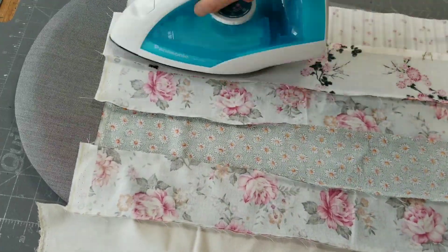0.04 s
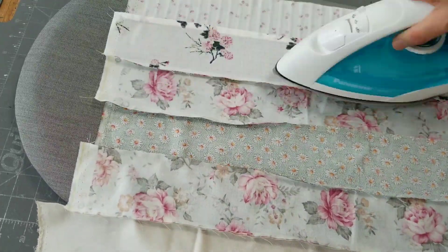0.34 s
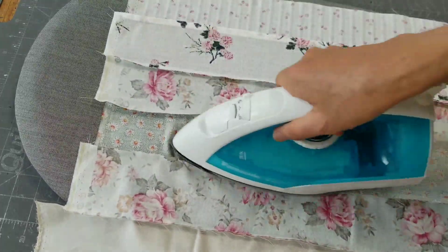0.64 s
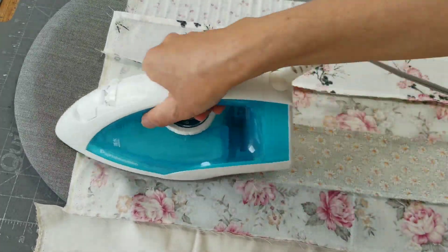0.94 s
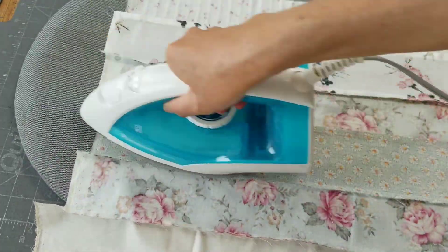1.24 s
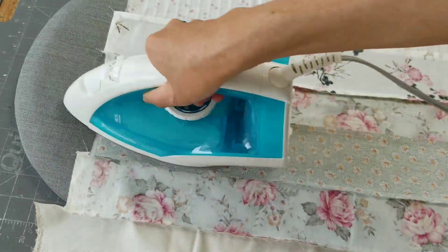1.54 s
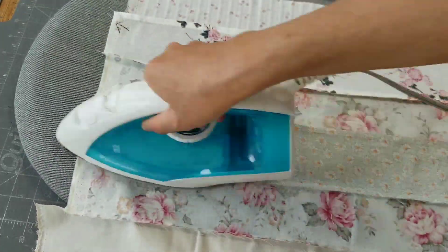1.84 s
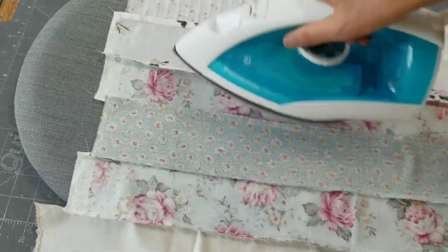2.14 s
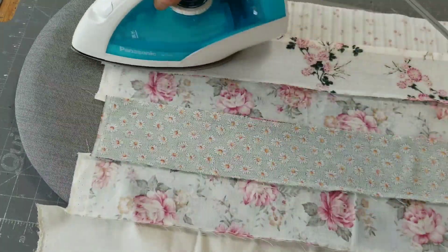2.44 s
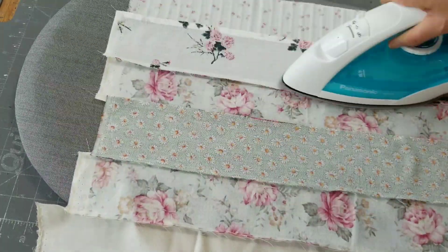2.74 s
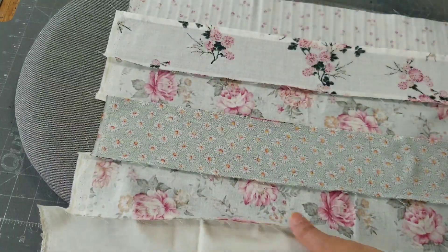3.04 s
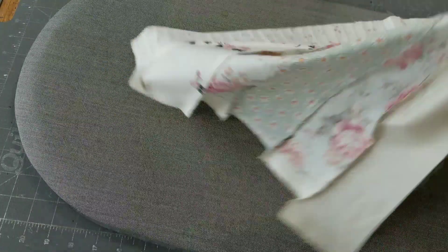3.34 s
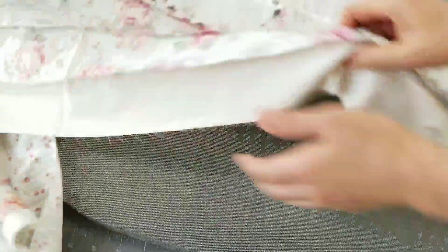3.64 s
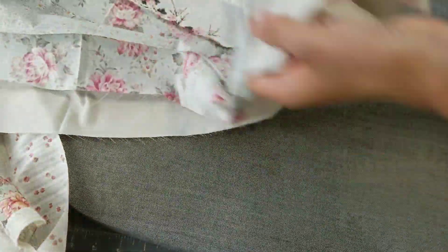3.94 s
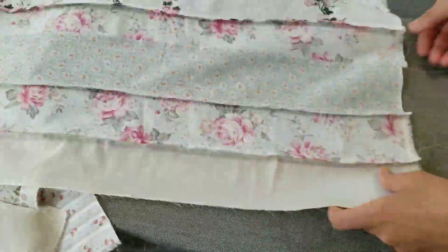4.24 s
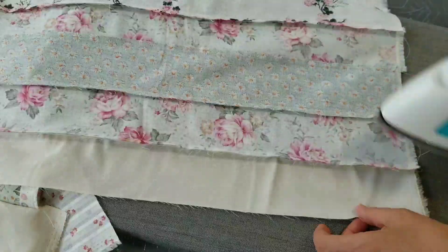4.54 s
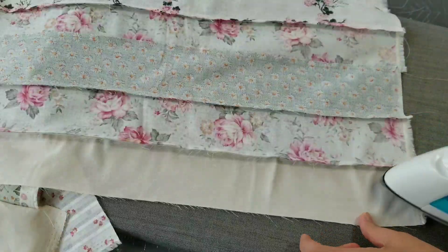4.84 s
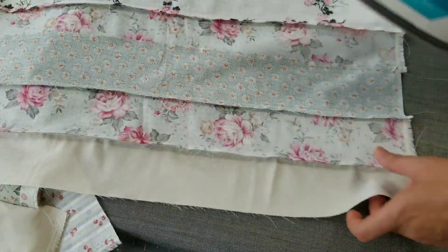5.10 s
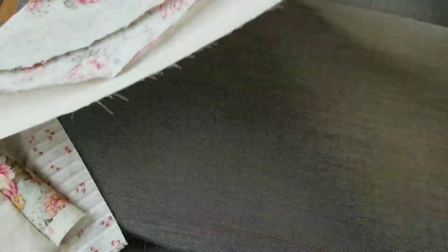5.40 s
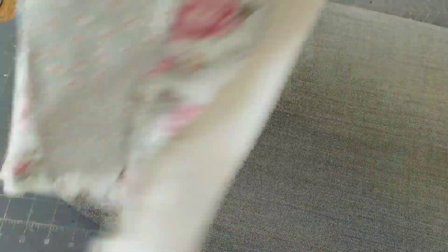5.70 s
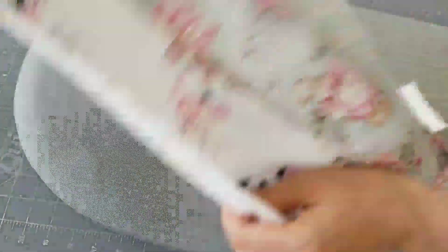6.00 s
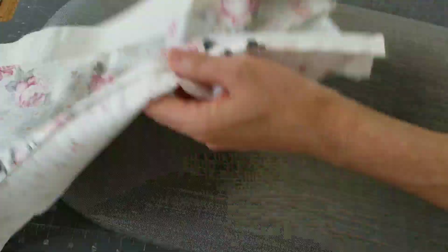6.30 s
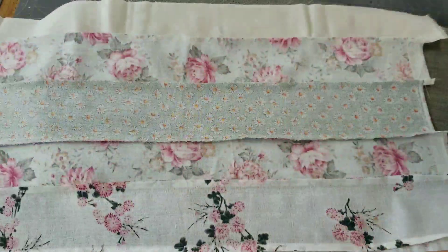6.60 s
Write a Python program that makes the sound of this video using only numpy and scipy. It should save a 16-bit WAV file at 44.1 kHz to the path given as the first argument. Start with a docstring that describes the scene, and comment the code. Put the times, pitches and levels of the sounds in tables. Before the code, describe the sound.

An iron slides to and fro over cloth with a faint hiss for the first three seconds, close to the microphone in a quiet room with a low rumble. It bumps dully on the padded ironing board at about 0.5 seconds and lands with a hollow knock at 2.3. After a light plastic tap at 3 seconds, a quick cluster of dull thumps and a scuff follows around 3.3. Fabric strips rustle softly on and off as they are lifted and turned. A small click comes at 3.7 seconds, then a sharp metallic click with a bump at 4.5 and a few lighter ticks. The loudest sound, a short booming stumble of thumps on the board, arrives at 5.4. From about 5 seconds a car passes faintly outside, its tyres swelling and engine note sinking. More rustling and a soft bump come around 6.2 seconds.

```python
"""An iron hisses softly over cloth, close to the microphone in a quiet room, then knocks down on the board.
Fabric strips are pressed, lifted and turned over: the padded top booms under each bump and its frame
buzzes, plastic and metal parts click, and fibres rustle as they catch and let go.
Late on, a car passes outside the window, its tyres swelling and its engine note sinking."""
import sys
import numpy as np
from scipy import signal
from scipy.fft import rfft, irfft
from scipy.io import wavfile
from scipy.ndimage import uniform_filter1d

SR = 44100
rng = np.random.default_rng(int(sys.argv[2]) if len(sys.argv) > 2 else 0)


def wrap_up_sound(samples):
    """Save the sound to the file named by the first command line argument, as 16-bit audio."""
    columns = np.atleast_2d(samples).T
    # keep every value between -1 and 1, then stretch to whole-number steps
    tamed = np.clip(columns, -1, 1)
    steps = np.round(tamed * 32767).astype(np.int16)
    wavfile.write(sys.argv[1], SR, steps)


N = 293706
TIME = np.arange(N) / SR
RING = TIME[:SR // 4]  # time since a blow

# Spectra give relative level per hertz; mode levels are relative to the blow.
# the room's rumble and the microphone's hiss: f/Hz, level/dB
RUMBLE_SPECTRUM = [(12, -26), (28, -6), (50, -4), (80, -1), (120, -5), (200, -13), (350, -19.5), (650, -27),
                   (1500, -33), (4000, -32)]
HISS_SPECTRUM = [(500, -18.5), (1500, -12.5), (3000, -8), (4800, -1), (5900, 1.5), (6800, 2), (7800, 11.5),
                 (8400, 7.5), (9400, -34.5), (11000, -29.5), (15800, -23), (17000, -40)]
# tyres and exhaust, heard from indoors: f/Hz, level/dB
TYRE_SPECTRUM = [(150, 2), (400, -1), (600, -5), (1100, 0.5), (1500, -7.5), (1950, -14), (3000, -29),
                 (6000, -49)]
EXHAUST_SPECTRUM = [(50, -2), (100, 1), (160, -3.5), (220, -3), (350, -7), (500, -14), (900, -37),
                    (3000, -89)]
# rubbing of the iron, pushed to and fro: t/s, level/dB
SLIDING = [(0.0, -70.5), (0.24, -74), (0.38, -66.5), (0.46, -95), (0.63, -69.5), (0.99, -79), (1.04, -79),
           (1.67, -76), (1.72, -69.5), (1.91, -76), (2.09, -80), (2.15, -66.5), (2.25, -97.5), (2.31, -70),
           (2.46, -71), (2.51, -84), (2.66, -67), (3.0, -84)]
# hiss of the soleplate: f/Hz, level/dB
SOLE_SPECTRUM = [(1500, -26), (3000, -8.5), (4200, -0.5), (5200, -3.5), (7000, 2), (12000, -16.5),
                 (17000, -32)]
# the soleplate sings faintly: t/s, length/s, f/Hz, level/dB
GLIDES = [(0.725, 0.15, 4470, -71), (1.085, 0.072, 4360, -68.5), (1.23, 0.074, 4400, -76),
          (1.356, .12, 3970, -75), (1.94, 0.16, 4430, -72), (2.15, 0.081, 4300, -73),
          (2.323, .16, 4320, -74.5)]
# drags on the padding: t/s, length/s, level/dB
SCUFFS = [(0.73, 0.16, -70), (3.247, 0.11, -43.5), (3.674, 0.074, -51.5), (3.989, .17, -63.5),
          (6.185, 0.28, -61)]
# rubbed padding, hissing fibres and the body of the weave: f/Hz, level/dB
PADDING_SPECTRUM = [(100, 1), (220, 3.5), (420, -3), (700, -10.5), (1500, -42), (4000, -55)]
FIBRE_SPECTRUM = [(600, -42), (1800, -29.5), (3600, -0.5), (6000, 3.5), (9500, 1), (13000, 2),
                  (15800, -3.5), (17000, -31)]
WEAVE_SPECTRUM = [(100, -10.5), (300, -1), (700, -1.5), (1130, 1), (2200, -3.5), (3500, -4.5), (7000, -20)]
# iron and hands sweep over the cloth: t/s, length/s, fibre level/dB, weave level/dB
STROKES = [(0, 0.22, -74, -72), (0.256, 0.2, -73, -71.5), (1.719, .11, -67, -65.5),
           (1.837, .15, -64.5, -69.5), (2.582, .2, -74, -69.5), (3.024, 0.071, -65, -58.5),
           (3.102, 0.29, -69, -68), (3.207, 0.27, -66.5, -69), (3.357, 0.26, -65, -64.5),
           (3.586, 0.41, -67, -75), (3.678, 0.073, -63, -59), (3.974, 0.27, -66.5, -71.5),
           (4.241, .05, -62, -78), (4.246, .18, -68, -78.5), (4.45, 0.12, -57, -56.5),
           (4.586, 0.062, -63, -64.5), (5.166, 0.085, -67.5, -61.5), (5.242, 0.25, -62, -58.5),
           (5.985, 0.22, -69, -75), (6.148, 0.22, -62.5, -64), (6.336, 0.16, -62.5, -66.5)]
# small hard contacts: t/s, snap level/dB, metal level/dB, left minus right/dB
TICKS = [(3.7264, -45, -63, -8), (4.252, -52, -55, 15), (4.479, -26, -34.5, 1.5), (4.5956, -45.5, -60, 3),
         (4.6163, -38.5, -32, -5), (5.3772, -42.5, -65, 0)]
# a small metal part: f/Hz, level/dB, t60/s
METAL_MODES = [(4590, -6, 0.049), (6310, -0.5, 0.035), (8260, -7.5, .04), (9980, 2, 0.044),
               (12100, -24, .035), (14340, -24, .04)]
# taps of housing and cord: t/s, level/dB, t60/s, resonance f/Hz, resonance level/dB, left minus right/dB
CLACKS = [(3.0481, -42, 0.065, 2700, 0, 4.5), (3.2913, -48, 0.097, 696, 2, 1),
          (3.7263, -44, 0.0091, 2030, 13.5, -8), (4.4443, -45.5, .11, 456, 6, -0.5),
          (5.114, -56.5, 0.087, 1800, 5, 2), (5.2723, -40.5, 0.064, 1250, 7, 1)]
# the plastic housing: f/Hz, level/dB
HOUSING_SPECTRUM = [(100, 1), (450, 2), (620, -2.5), (950, 3), (1600, -7), (2300, -7), (3200, -13),
                    (5000, -21.5), (10000, -33.5), (16000, -34)]
# the iron comes down and rocks: t/s, level/dB, contact/ms
KNOCKS = [(0.5453, -37.5, 0.99), (0.5648, -51, 1), (2.293, -19, 0.57), (2.2959, -26, 0.78),
          (2.304, -28.5, 0.56), (2.4199, -51.5, 0.22), (2.449, -61, 0.3)]
# the iron's body: f/Hz, level/dB, t60/s
IRON_MODES = [(86.4, -6, 0.053), (160, -7, 0.1), (295, -5, 0.05), (399.5, -8, 0.038), (478, -3.5, 0.035),
              (708, -7.5, 0.04), (972, -13, 0.06), (1246, -24, 0.06), (1349, -26, 0.05), (1784, -23, 0.06),
              (1943, -26, 0.06), (2680, -14, 0.07)]
# the dense ring of its shell: f/Hz, level/dB
SHELL_SPECTRUM = [(150, -5.5), (500, -2), (1000, -1.5), (1400, -6), (2000, -27), (3100, -6), (3900, -26),
                  (8000, -27), (16000, -35)]
# bumps on the board: t/s, level/dB, contact/ms, relative frame buzz/dB
BUMPS = [(0.486, -41, 8.6, -46), (0.542, -27.5, 8, -40), (0.5519, -26, 3, -34), (0.5588, -28.5, 6, -39),
         (0.964, -57, 1.3, -21), (1.348, -53, 1.3, -20), (1.521, -53.5, 1.4, -24.5),
         (2.2948, -22, 1.04, -15.5), (2.426, -40.5, 3.3, -17), (3.158, -27.5, 2.25, -27),
         (3.2335, -22.5, 2.7, -37), (3.2612, -19, 2.84, -38), (3.2743, -24.5, 2.1, -36),
         (3.2991, -14, 2.05, -39), (3.337, -32, 2.15, -41), (4.489, -29, 2.9, -18),
         (4.786, -38.5, 4.1, -38), (5.3717, -6, 2, -25.5), (5.4021, -14, 1.42, -29),
         (5.4264, -14.5, 3.7, -28.5), (6.242, -35.5, 4.3, -35)]
# the padded top: multiple of the ring pitch, level/dB, t60/s
BOARD_MODES = [(.27, -22.5, 0.095), (.48, -24, 0.12), (1, 2.5, 0.065), (1.9, -24.5, 0.1),
               (2.55, -20.5, 0.075), (3.6, -14, 0.033), (5.1, -13, 0.047)]
# the buzzing frame: f/Hz, level/dB
FRAME_SPECTRUM = [(150, -19.5), (400, -6), (800, -0.5), (1100, -4), (1500, -4.5), (2100, -13.5),
                  (4000, -26.5), (10000, -35), (16000, -40)]


def undb(db):
    """Decibels to gain."""
    return 10 ** (np.asarray(db) / 20)


def pan(db):
    """Left and right gains, db apart."""
    return undb(np.array([[db], [-db]]) / 2)


def noise(spectrum, size=N, tilt_db=0, alike_hz=600):
    """Stereo noise of rms 1, tilted by tilt_db per octave; below alike_hz the sides are alike."""
    f = np.maximum(np.fft.rfftfreq(size, 1 / SR), 1)
    hz, db = np.transpose(spectrum)
    gain = undb(np.interp(np.log(f), np.log(hz), db) + tilt_db * np.log2(f))
    alike = 1 / (1 + (f / alike_hz) ** 2)
    mid, side = rfft(rng.standard_normal((2, size)))
    side = side * np.sqrt(1 - .96 * alike) * np.array([[1], [-1]])
    x = irfft(gain * (mid * np.sqrt(1 + alike) + side), size)
    return x / x.std()


def walk(rate):
    """Random levels held 1 / rate s and smoothed twice; spread near 1."""
    hold = max(int(SR / rate), 1)
    steps = np.repeat(rng.standard_normal(N // hold + 1), hold)
    return 1.3 * uniform_filter1d(uniform_filter1d(steps, hold), hold)[:N]


def fade(t60):
    """Exponential decay by 60 dB in t60 seconds."""
    return np.exp(-np.log(1000) * RING / t60)


def ring(modes, pitch=1):
    """Damped modes set off together by a blow."""
    return sum(undb(db) * fade(t60) * np.cos(2 * np.pi * hz * pitch * RING) for hz, db, t60 in modes)


def soften(x, contact_ms):
    """A longer contact spreads the push and takes the treble out of the blow."""
    push = np.sin(np.pi * np.minimum(RING[:SR // 100] * 1000 / contact_ms, 1))
    return signal.lfilter(push / push.sum(), 1, x)


def add(out, s, x):
    """Mix a sound in at time s."""
    i = int(s * SR)
    out[:, i:i + x.shape[-1]] += x[..., :N - i]


def stroke(start, length, peak_at=.27):
    """Speed of a sweep, 0 to 1: it gathers pace quickly and slows more gently."""
    ramp = np.interp(TIME, [start, start + length * peak_at, start + length], [0, 1, 0])
    return np.sin(np.pi / 2 * ramp)


def sliding_db(stop_s=2.95, fall_db_per_s=145):
    """How loudly the iron rubs; the sound dies as it comes to rest."""
    return np.interp(TIME, *np.transpose(SLIDING)) - fall_db_per_s * np.maximum(TIME - stop_s, 0)


def room(rumble_db=-63, hiss_db=-72):
    """Room tone: a restless low rumble under the microphone's even hiss."""
    rumble = undb(rumble_db + 1.3 * walk(22)) * noise(RUMBLE_SPECTRUM, alike_hz=366)
    return rumble + undb(hiss_db) * noise(HISS_SPECTRUM)


def walls(x, wet_db=-26, t60=0.22):
    """The walls add a short echo, different at each side and faint this close to the board."""
    echo = rng.standard_normal((2, len(RING))) * fade(t60) * (RING > .003)
    echo /= np.sqrt(np.sum(echo ** 2, axis=1, keepdims=True))
    return x + undb(wet_db) * signal.fftconvolve(x, echo, axes=1)[:, :N]


def car(pass_s=5.456, near_s=0.36, tyre_db=-56, engine_db=-57, engine_hz=167, sag_hz_per_s2=6.5):
    """Outside the window, tyre noise swells and fades as the engine note sinks ever faster."""
    hz = engine_hz - sag_hz_per_s2 * np.maximum(TIME - 4.6, 0) ** 2
    wavering_hz = hz * (1 + 0.00788 * walk(21.96))
    note = np.sqrt(2) * np.sin(2 * np.pi * np.cumsum(wavering_hz) / SR)
    note *= undb(-5.5 + 2.5 * walk(4))
    away_s = np.hypot(TIME - pass_s, near_s) - near_s  # zero when the car is closest
    tyres = undb(tyre_db - 30 * away_s) * noise(TYRE_SPECTRUM)
    drone = undb(-1) * noise(EXHAUST_SPECTRUM)
    # the engine grows louder, holds its level, then recedes
    approach_db = 35.5 * np.minimum(TIME - 5.076, 0)
    leave_db = -39 * np.maximum(TIME - 6.45, 0)
    return tyres + undb(engine_db + approach_db + leave_db) * (note + drone)


def soleplate(plate_db=-71, follow=.15, waver_db=0.5):
    """The plate hisses over the cloth; now and then friction excites one narrow band."""
    rub_db = sliding_db()
    level_db = plate_db + follow * (rub_db - rub_db.max()) - waver_db * walk(10)
    out = undb(level_db) * noise(SOLE_SPECTRUM)
    for start, length, hz, db in GLIDES:
        band = noise([(hz / 2, -60), (hz * .86, -16), (hz, 0), (hz * 1.14, -16), (hz * 2, -60)])
        out += undb(db) * stroke(start, length) * band
    return out


def scuffs(grain_db=3):
    """Something drags on the padding with a dull, grainy murmur."""
    level = sum(undb(db) * stroke(start, length) for start, length, db in SCUFFS)
    return level * undb(grain_db * walk(150)) * noise(PADDING_SPECTRUM, alike_hz=700)


def cloth(rest_fibre_db=-80, rest_weave_db=-86, iron_hiss_db=1, grain_db=2.0, catch_db=2.0):
    """Close up, fibres hiss and the weave whispers under hands and iron; threads catch and let go."""
    fibre_power = undb(rest_fibre_db) ** 2 + undb(sliding_db() + iron_hiss_db) ** 2
    weave_power = undb(rest_weave_db) ** 2
    for start, length, fibre_db, weave_db in STROKES:
        speed = stroke(start, length)
        fibre_power += (undb(fibre_db) * speed) ** 2
        weave_power += (undb(weave_db) * speed) ** 2
    catching = undb(grain_db * walk(600) + catch_db * walk(35))
    fibres = np.sqrt(fibre_power) * noise(FIBRE_SPECTRUM, alike_hz=2120)
    weave = np.sqrt(weave_power) * noise(WEAVE_SPECTRUM, alike_hz=890)
    return catching * (fibres + weave)


def ticks(snap_t60=0.005, tail_db=-24, tail_t60=0.12, damped_t60=0.011, free_db=-17):
    """Sharp contacts to either side of the microphone, some of which ring a small metal part."""
    out = np.zeros((2, N))
    # the metal is damped quickly by whatever touches it, then rings on faintly
    metal = ring(METAL_MODES) * (1 - fade(0.0033)) * (fade(damped_t60) + undb(free_db))
    decay = fade(snap_t60) + undb(tail_db) * fade(tail_t60)
    for s, snap_db, metal_db, pan_db in TICKS:
        snap = noise(FIBRE_SPECTRUM, size=len(RING), tilt_db=2.0, alike_hz=9100) * decay
        add(out, s, (undb(snap_db) * snap + undb(metal_db) * metal) * pan(pan_db))
    return out


def clacks(tail_db=-26, tail_t60=0.21, q=4):
    """Plastic parts tap and die away at once, each with a broad resonance of its own."""
    out = np.zeros((2, N))
    for s, db, t60, hz, resonance_db, pan_db in CLACKS:
        decay = fade(t60) + undb(tail_db) * fade(tail_t60)
        body = noise(HOUSING_SPECTRUM, size=len(RING), tilt_db=1.8, alike_hz=1270) * decay
        resonance = undb(resonance_db) * signal.lfilter(*signal.iirpeak(hz, q, fs=SR), body)
        add(out, s, undb(db) * (body + resonance) * pan(pan_db))
    return out


def iron(shell_db=-8, shell_t60=0.073):
    """The iron lands on the cloth: a hollow knock from its body and shell."""
    out = np.zeros((2, N))
    for s, db, contact_ms in KNOCKS:
        shell = noise(SHELL_SPECTRUM, size=len(RING), alike_hz=550) * fade(shell_t60) * undb(shell_db)
        add(out, s, undb(db) * soften(ring(IRON_MODES) + shell, contact_ms))
    return out


def board(ring_hz=139.4, firm_db=-35, loading_ms=6.4, buzz_t60=0.091, open_hz=30, left_lag_ms=0.12):
    """Right by the microphone, the padded top booms like a dead drum while its frame buzzes briefly."""
    out = np.zeros((2, N))
    # air slips round the edges of the board and cancels its lowest notes
    edges = signal.butter(1, open_hz, "high", fs=SR)
    for s, db, contact_ms, buzz_db in BUMPS:
        octaves_up = 0.05 * max(firm_db - db, 0)  # lighter touches ring higher
        load = np.hypot(1, (contact_ms / loading_ms) ** 2)  # a long contact weighs the top down
        hz = ring_hz * 2 ** octaves_up / load
        boom = signal.lfilter(*edges, soften(ring(BOARD_MODES, hz), contact_ms))
        left = np.interp(RING - left_lag_ms / 1000, RING, boom)
        buzz = noise(FRAME_SPECTRUM, size=len(RING), alike_hz=1200) * fade(buzz_t60) * undb(buzz_db)
        add(out, s, undb(db) * (np.array([left, boom]) + buzz))
    return out


def scene():
    """The ironing board in front, the car and the room tone behind."""
    blows = board() + iron() + clacks() + ticks()
    return walls(blows) + cloth() + scuffs() + soleplate() + car() + room()


def record(dry, top_hz=15950):
    """The recorder cuts the highest treble steeply."""
    return signal.sosfilt(signal.ellip(10, .2, 80, top_hz, fs=SR, output="sos"), dry)


dry = scene()
out = record(dry)
wrap_up_sound(out)
```